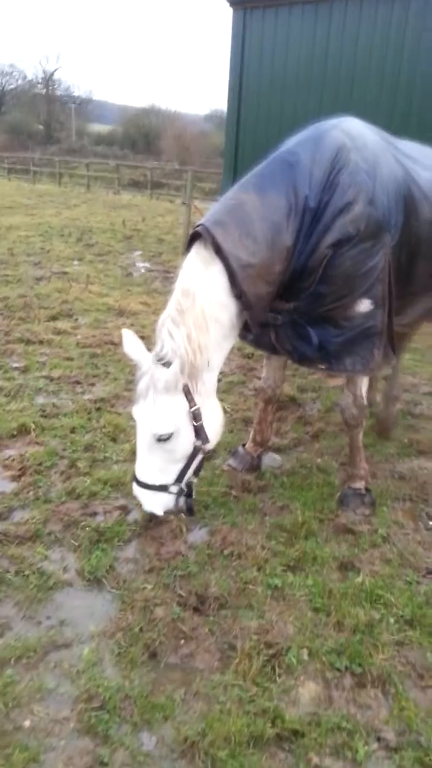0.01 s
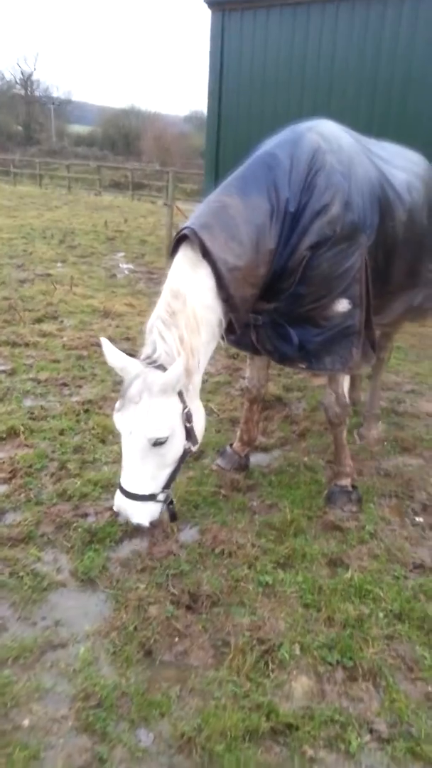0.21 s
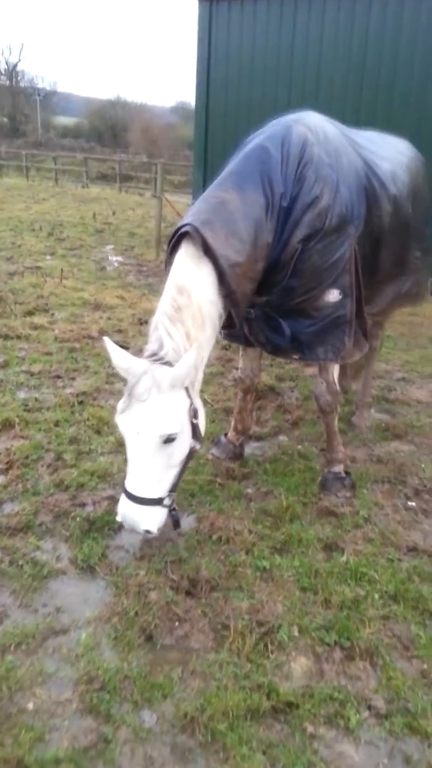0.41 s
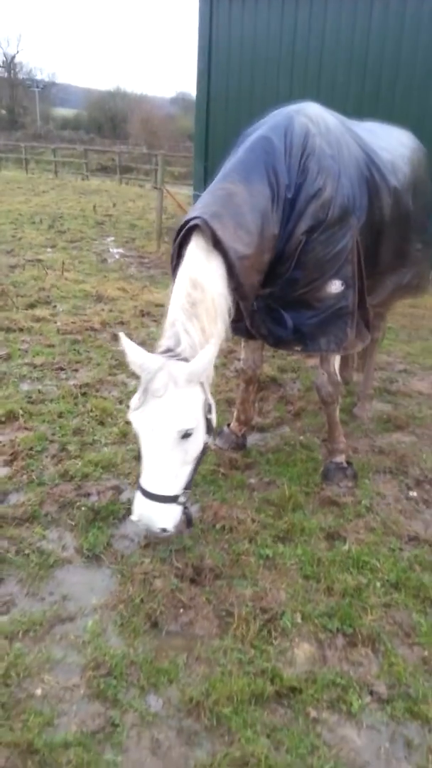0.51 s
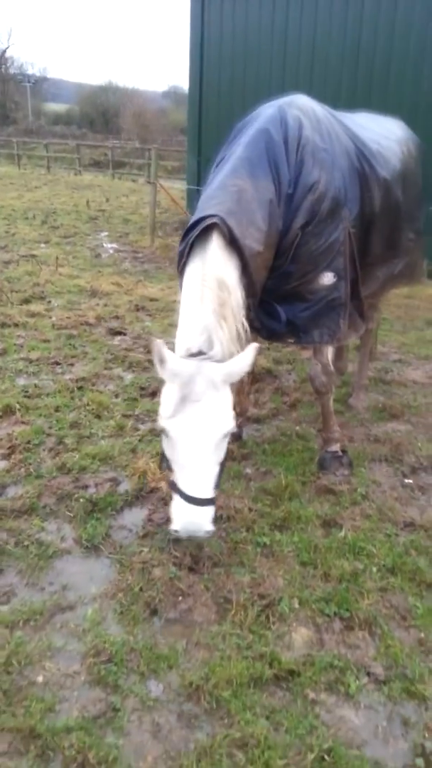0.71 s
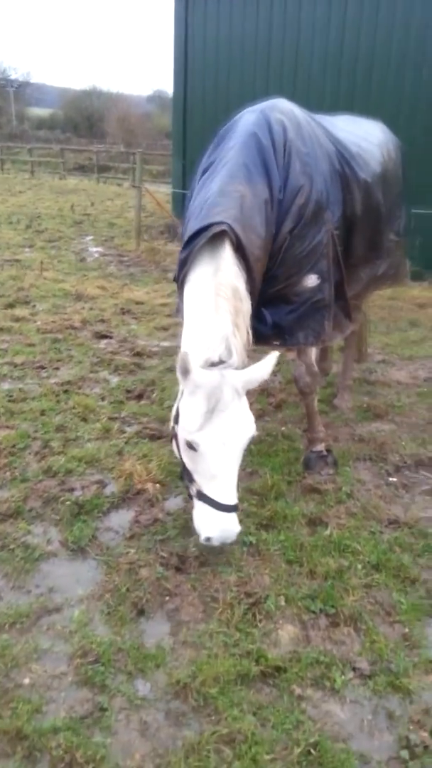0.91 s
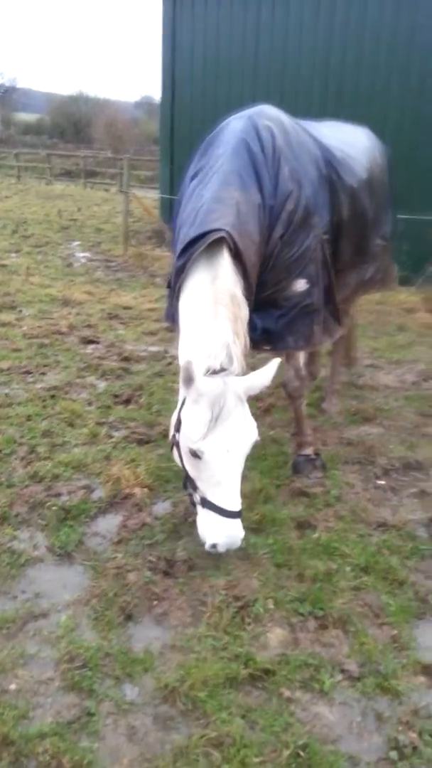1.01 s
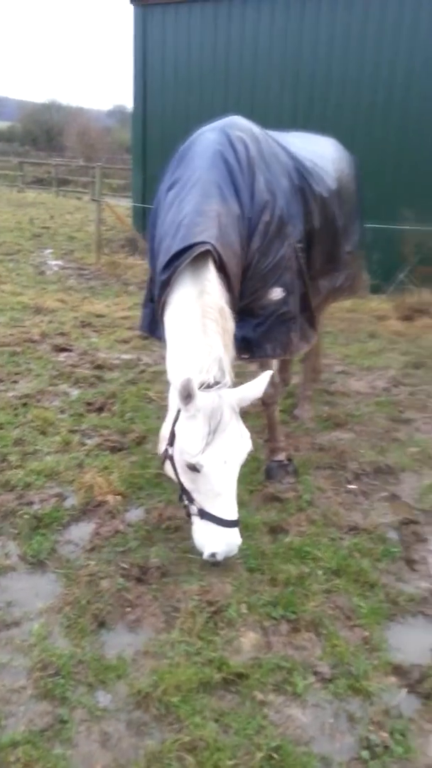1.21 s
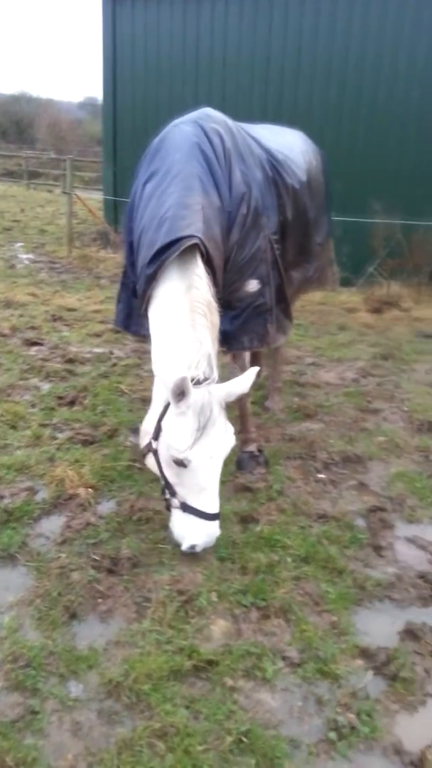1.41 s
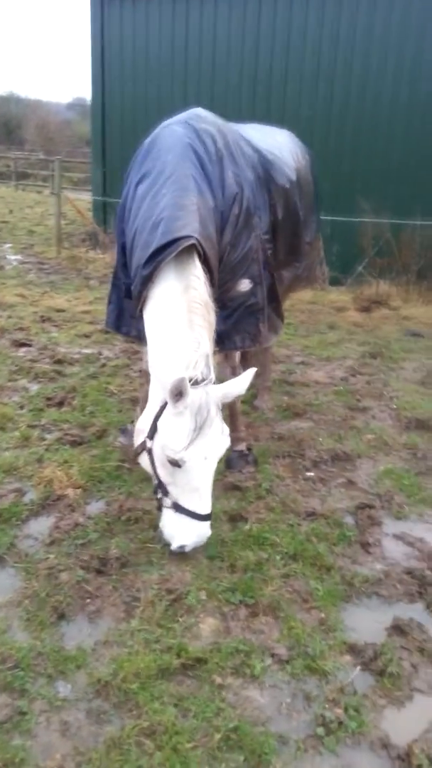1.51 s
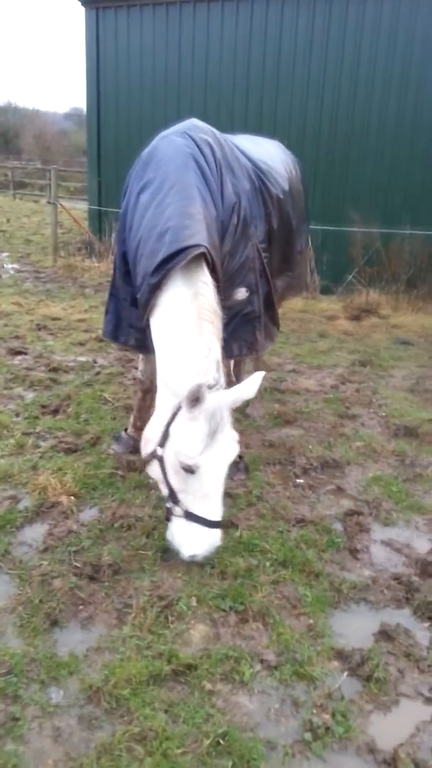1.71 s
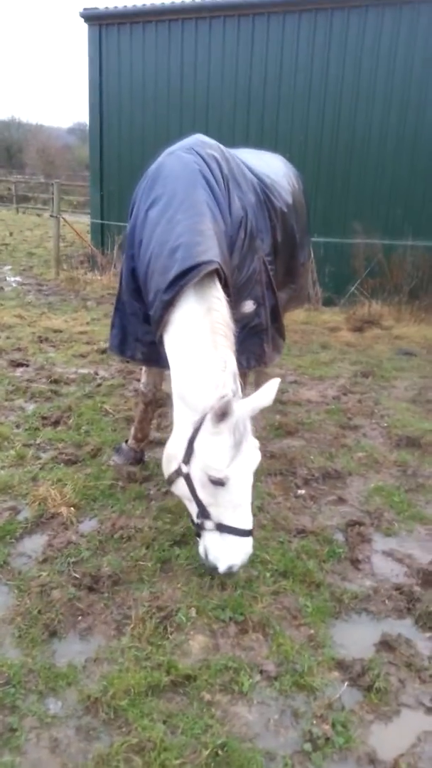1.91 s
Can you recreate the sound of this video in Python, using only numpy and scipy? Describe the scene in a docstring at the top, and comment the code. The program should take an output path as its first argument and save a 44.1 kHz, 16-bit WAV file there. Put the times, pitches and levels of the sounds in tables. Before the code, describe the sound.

A horse snort: a short grainy rasp at 0.1 seconds, then from 0.23 a strong, wet nostril flutter with rushing air and tiny squeaks, weakening and slowing until about 0.87, ending in a small puff of air. Grass rustles with clicks around 1.05-1.12 and 1.55-1.78; a soft sniff comes near 1.5. Low wind buffets the right side, strongest at 1.7, over quiet outdoor hush.

```python
"""A grazing horse gives one long snort: both nostrils flutter, each at its own uneven, slowing rate.
Each flap is a soft puff ringing the nose plus a wet slap of noise, over a hiss of rushing air.
A wet rasp of grainy noise comes first; a noise sniff, clicks in rustling grass and ringing squeaks add detail.
Wind, made of brief pressure dips and low noise, buffets the right side of the microphone.
A soft outdoor hush of coloured noise lies behind, and the muddy paddock adds faint echoes."""
import sys
import numpy as np
from scipy import signal
from scipy.fft import rfft, irfft
from scipy.io import wavfile

SR = 44100
rng = np.random.default_rng(int(sys.argv[2]) if len(sys.argv) > 2 else 0)


def wav_out(sig):
    """Save sig, one row per channel (or a flat mono array), as 16-bit PCM at SR to the path in sys.argv[1]."""
    wavfile.write(sys.argv[1], SR, np.round(np.clip(np.atleast_2d(sig).T, -1, 1) * 32767).astype(np.int16))


N = 88200
T = np.arange(N) / SR  # time in seconds

# All levels are set before panning, echoes and the microphone's colour.
# Snort: first flap of each nostril, and the time after which no flap starts, in seconds
FIRST_A_S, FIRST_B_S, SNORT_END_S = .2383, .2301, .86
# Flutter rate of each nostril. Each row: time in seconds, flaps per second.
FLUTTER_RATE_A = [(.24, 32.3), (.27, 32.2), (.3, 30.5), (.333, 32.3), (.365, 30.2), (.41, 28.9),
                  (.53, 30.1), (.64, 30.3), (.8, 26.9)]
FLUTTER_RATE_B = [(.23, 30.3), (.263, 29), (.297, 29.5), (.331, 26.4), (.37, 26.6), (.46, 25.45),
                  (.62, 26.7), (.8, 23.45)]
# Strength of the flaps of each nostril. Each row: time in seconds, strength in dB before the puff trim.
FLAP_FORCE_A = [(.238, -9), (.27, -6.5), (.333, -10.5), (.365, -11.5), (.44, -17.5), (.55, -16),
                (.67, -22.5), (.77, -13.5), (.805, -17), (.843, -19)]
FLAP_FORCE_B = [(.23, -21.5), (0.265, -8.5), (.33, -6.5), (0.369, -12), (.41, -16), (.485, -21.5),
                (.525, -19), (.64, -19), (.72, -23.5), (.8, -22.5), (.84, -32)]
# Half width of the dip in a flap of FIRM_DB; harder flaps are shorter, by a share per dB
FLAP_HALF_S, FIRM_DB, QUICKER_PER_DB = .00054, -14, .011
# Random spread from flap to flap: strength in dB, then width and nose pitch as shares
FLAP_SPREAD_DB, WIDTH_SPREAD, NOSE_SHIFT = 1.14, .07, .07
# Bass cut of the puffs in Hz, and their trim in dB
RADIATION_HZ, PUFF_DB = 125, -3.5
# Ringing of the nose after a flap. Each row: pitch in Hz, width in Hz, level in dB.
NOSE_MODES = [(249, 86, 5), (670, 267, 5), (864, 120, -9)]
# Narrow passages, rung by slap and hiss. Each row: pitch in Hz, width in Hz, level in dB.
PASSAGE_MODES = [(850, 108, 10.5), (1348, 165, 4), (1840, 220, -21), (2247, 160, 1.5), (2990, 100, -9.5),
                 (3830, 210, -21)]
PASSAGE_TOP_HZ, PASSAGE_SHIFT = 4440, .058  # treble cut; random pitch shift as a share
# Loudness of the wet slap against its flap. Each row: time in seconds, relative level in dB.
SLAP_WETNESS = [(.33, -14), (.47, -9), (.59, -5), (.66, -10), (.75, -6), (.84, -7.5)]
SLAP_RISE_S, SLAP_DECAY_S, SLAP_SPREAD_DB = .001, .003, 2
# Rush of air through the nostrils. Each row: time in seconds, level in dB.
AIR_FLOW = [(.17, -85), (.2, -54), (.235, -41.5), (.27, -38), (.32, -35), (.36, -41), (.42, -41),
            (.47, -48.5), (.8, -63), (.865, -59), (.895, -41.5), (.93, -54), (1.0, -80)]
SPRAY_PER_S, SPRAY_DB, JET_DB = 550, 17, -4.5  # droplets per second; dB against the steady air, the hiss
# Colour of the jet noise outside. Each row: frequency in Hz, relative dB per Hz.
JET_COLOUR = [(600, -30), (1500, 10.5), (4500, 5), (6000, 1), (10000, -2.5), (14000, -22)]

# Loudness of the rasp. Each row: time in seconds, level in dB.
RASP_LEVEL = [(.095, -60), (.105, -39), (.128, -43.5), (.137, -30.5), (.145, -34), (.156, -42.5),
              (.167, -36), (.185, -43.5), (.22, -52), (.25, -77)]
# Hollow ringing of the rasp. Each row: pitch in Hz, width in Hz, relative level in dB.
RASP_RINGING = [(865, 87, -2), (1150, 71, 1), (1410, 140, 13), (2000, 270, -4), (2400, 340, 0.5),
                (3100, 300, -5)]
RASP_FIZZ_DB, RASP_GRAIN_DB = -7.5, -3  # jet noise against ringing; grains against a steady level
# Wet pops and squeaks at the muzzle. Each row: time in seconds, peak in dB, pitch in Hz,
# half length in seconds.
MUZZLE_SQUEAKS = [(0.135, -27.5, 850, 0.0034), (0.165, -28.5, 1480, 0.0047), (0.23, -35.5, 5060, .003),
                  (0.2622, -19.5, 3110, 0.0012), (0.268, -13.5, 2400, 0.002), (0.292, -28.5, 4770, 0.006),
                  (0.299, -15.5, 2430, 0.0027), (.312, -25, 2350, 0.0065), (0.3218, -20, 2420, 0.0024),
                  (0.3357, -31.5, 9300, 0.0013), (0.395, -30, 2050, 0.0012), (.8912, -28, 2800, 0.0032),
                  (1.704, -41, 3530, 0.0012), (1.740, -41, 2400, 0.0059)]
SQUEAK_WIDTH = .32  # resonance width as a share of the pitch
# Loudness of the soft sniff. Each row: time in seconds, level in dB.
SNIFF_LEVEL = [(1.33, -74), (1.44, -52), (1.58, -54.5), (1.68, -74)]
# Ringing of the sniff. Each row: pitch in Hz, width in Hz, relative level in dB.
SNIFF_RINGING = [(1950, 750, 0), (2800, 650, 0)]
# Clicks of lips, grass and teeth. Each row: time in seconds, peak in dB, pitch in Hz.
GRAZING_CLICKS = [(1.0375, -34, 4500), (1.0625, -31, 3200), (1.0835, -33, 900), (1.1212, -20, 1700),
                  (1.549, -32, 2400), (1.573, -28, 2600), (1.6175, -21.5, 3400), (1.630, -28, 3800),
                  (1.7785, -26, 1000)]
CLICK_WIDTH = .8  # resonance width as a share of the pitch
# Loudness of the rustling grass. Each row: time in seconds, level in dB.
RUSTLE_LEVEL = [(0, -50), (.85, -44.5), (.95, -45.5), (1.02, -51), (1.12, -45.5), (1.2, -54.5), (1.35, -53),
                (1.46, -47), (1.58, -50), (1.68, -49), (1.74, -48.5), (1.81, -54), (2, -56)]
# Colour of the rustle. Each row: frequency in Hz, relative dB per Hz.
GRASS_COLOUR = [(650, 17.5), (1400, 8.5), (2100, 6), (2900, 5), (4500, -3.5), (7000, -10), (14000, -27)]

# Single buffets on the microphone. Each row: time in seconds, peak in dB on the right.
WIND_BUFFETS = [(0.2048, -17), (0.7133, -19), (0.852, -20), (0.8686, -23), (0.8763, -15.5), (1.118, -22.5),
                (1.328, -24.5), (1.5052, -20), (1.5118, -24), (1.5223, -23.5), (1.6427, -22.5),
                (1.6623, -21.5), (1.7057, -12), (1.713, -10), (1.7496, -10), (1.7561, -21), (1.7711, -19)]
BUFFET_HALF_S, WIND_LEFT_DB = .00095, -29.5  # half width of the dip; left side against right
# Rumble of the eddies between buffets. Each row: time in seconds, level in dB on the right.
EDDY_LEVEL = [(0, -34), (.05, -54), (.16, -56.5), (.25, -31.5), (.45, -42), (.8, -40.5), (.87, -30.5),
              (.93, -43.5), (1.03, -48), (1.07, -36.5), (1.125, -39.5), (1.17, -50.5), (1.29, -43.5),
              (1.32, -36), (1.36, -48), (1.48, -51), (1.51, -34), (1.55, -32), (1.62, -41), (1.69, -42),
              (1.77, -29.5), (1.81, -49), (1.94, -91), (1.99, -50)]
# Colour of the eddies. Each row: frequency in Hz, relative dB per Hz.
EDDY_COLOUR = [(25, -17.5), (60, -1.5), (140, 3), (280, -1), (420, -18.5), (700, -20.5), (1500, -50)]
# Colour of the outdoor hush. Each row: frequency in Hz, relative dB per Hz.
HUSH_COLOUR = [(25, -19), (90, -1.5), (250, 4), (420, -2.5), (600, -0.5), (1000, -2.5), (2000, -8),
               (4000, -13.5), (6500, -18), (9000, -15.5), (14500, -17.5)]
HUSH_DB = -48

# Likeness of left and right in coloured noise. Each row: frequency in Hz, likeness from 0 to 1.
SIDE_LIKENESS = [(50, 1), (500, 0.79), (1500, 0.089), (4000, 0), (10000, 0)]
# Lean to the right: each pan lowers the left and raises the right by this many dB
FLUTTER_PAN_DB, HISS_PAN_DB, SQUEAK_PAN_DB, HUSH_PAN_DB = 1.5, 1.5, 1.5, 1.5
LEFT_LEAD_S = .00008  # the flutter reaches the left this much sooner
# Echoes from ground and shed. Each row: delay in seconds, left level in dB, right level in dB.
EARLY_ECHOES = [(.0017, -22, -10), (.0143, -24, -22)]
SCATTER_DB, SCATTER_T60_S, SCATTER_HZ = -12, .09, 3960  # level, time to fade by 60 dB, treble cut
# Extra upper middle on the right of the microphone. Each row: pitch in Hz, width in Hz, added level in dB.
RIGHT_BRIGHTNESS = [(4440, 1100, -14.5)]
CUTOFF_HZ = 14700


def from_db(db):
    """Turn decibels into gain."""
    return 10 ** (np.asarray(db) / 20)


def rms_one(x):
    """Scale to an average power of one."""
    return x / np.sqrt(np.mean(x ** 2) + 1e-20)


def curve(rows, s=T):
    """Read a table at the given times, with straight lines between its rows."""
    return np.interp(s, *np.transpose(rows))


def at_hz(points, hz):
    """Read a table of frequencies, with straight lines over log frequency."""
    return curve([(np.log(f), v) for f, v in points], np.log(hz))


def pan(db):
    """Left and right gains that lean a sound to the right."""
    return from_db([[-db], [db]])


def resonate(x, modes):
    """Resonances ring side by side, each peaking at gain 1 before its own dB; wider ones die sooner."""
    out = 0
    for hz, width, db in modes:
        r = np.exp(-np.pi * width / SR)
        feedback = [1, -2 * r * np.cos(2 * np.pi * hz / SR), r * r]
        ringing = signal.lfilter([1, 0, -1], feedback, x + 1e-18)
        out = out + from_db(db) * (1 - r * r) / 2 * ringing
    return out


def white():
    """White noise, partly shared by the two sides."""
    return rms_one(rng.standard_normal(N) + 1.33 * rng.standard_normal((2, N)))


def noise(spectrum):
    """Stereo noise of a given colour, alike on both sides in the bass, with power one."""
    hz = np.maximum(np.fft.rfftfreq(N, 1 / SR), 1)
    mid, side = rfft(rng.standard_normal((2, N)))
    alike = np.clip(at_hz(SIDE_LIKENESS, hz), 0, 1)
    sides = np.sqrt(1 + alike) * mid + np.sqrt(1 - alike) * side * [[1], [-1]]
    below = np.minimum(hz / spectrum[0][0], 1) ** 2  # fades under the lowest row
    return rms_one(irfft(below * from_db(at_hz(spectrum, hz)) * sides, N))


def dying(clicks, decay_s):
    """Each click starts an exponential fall."""
    return signal.lfilter([1], [1, -np.exp(-1 / (decay_s * SR))], clicks + 1e-18)


def crackle(per_s, spread_db, decay_s):
    """Loudness shape of random little bursts of uneven size, with power one."""
    sizes = from_db(spread_db * np.minimum(rng.exponential(1, N), 3))
    starts = rng.random(N) < per_s / SR
    return rms_one(dying(sizes * starts, decay_s))


def puff(s, half_s):
    """A brief, smooth check in an air stream: a pressure dip between two crests."""
    u = np.minimum(((T - s) / half_s) ** 2, 100)
    return (u - 1) * np.exp(-u / 2)


def nostril(first_s, rate, force):
    """The wall flaps shut again and again; each flap puffs into the nose, slaps wetly and reshapes it."""
    puffs, slaps = np.zeros(N), np.zeros((2, N))
    air, s = white(), first_s
    slap_t = T[:SR // 40]
    slap_shape = np.minimum(slap_t / SLAP_RISE_S, 1) * np.exp(-slap_t / SLAP_DECAY_S)
    for size, width, wet, stretch in rng.standard_normal((30, 4)):
        if s > SNORT_END_S:
            break
        db = curve(force, s) + FLAP_SPREAD_DB * size
        half_s = FLAP_HALF_S * np.exp(WIDTH_SPREAD * width - QUICKER_PER_DB * (db - FIRM_DB))
        flap = from_db(db) * puff(s, half_s)
        nose = [(hz * np.exp(NOSE_SHIFT * stretch), wide, gain) for hz, wide, gain in NOSE_MODES]
        puffs += flap + resonate(flap, nose)

        # the slap starts two typical half widths before the middle of the dip, near the leading crest, and
        # swells in
        span = int((s - 2 * FLAP_HALF_S) * SR) + np.arange(len(slap_t))
        slap = passages(air[:, span] * slap_shape, PASSAGE_SHIFT * stretch)
        slap_db = curve(SLAP_WETNESS, s) + db + SLAP_SPREAD_DB * wet
        slaps[:, span] += 2 * from_db(slap_db) * slap
        s += 1 / curve(rate, s)
    bass_cut = signal.butter(1, RADIATION_HZ, "high", fs=SR, output="sos")
    return from_db(PUFF_DB) * signal.sosfilt(bass_cut, puffs) + slaps


def passages(x, stretch=0):
    """Narrow nasal passages ring and damp the treble; stretch shifts their pitches."""
    modes = [(hz * np.exp(stretch), width, db) for hz, width, db in PASSAGE_MODES]
    treble_cut = signal.butter(2, PASSAGE_TOP_HZ, fs=SR, output="sos")
    return signal.sosfilt(treble_cut, resonate(x, modes))


def hiss():
    """Air and droplets rush through the passages, with a broad jet noise outside."""
    spray = from_db(SPRAY_DB) * crackle(SPRAY_PER_S, spread_db=4, decay_s=.001)
    air = rms_one(passages(white() * (1 + spray)))
    return from_db(curve(AIR_FLOW)) * (air + from_db(JET_DB) * noise(JET_COLOUR))


def rasp():
    """Grainy bursts of noise ring hollow resonances, with a fizz of jet noise."""
    bursts = crackle(per_s=900, spread_db=3, decay_s=.001)
    grains = rms_one(1 + from_db(RASP_GRAIN_DB) * bursts)
    hollow = rms_one(resonate(white(), RASP_RINGING))
    fizz = from_db(RASP_FIZZ_DB) * noise(JET_COLOUR)
    return from_db(curve(RASP_LEVEL)) * grains * (hollow + fizz)


def ping(envelope, hz, width, db):
    """A burst of noise rings one steep-sided resonance, up to a given peak."""
    mode = [(hz, width * hz, 0)]
    x = resonate(resonate(envelope * white(), mode), mode)
    return from_db(db) * x / abs(x).max()


def squeaks():
    """Films of moisture at nostrils and lips pop and squeak for a few milliseconds."""
    total = 0
    for s, db, hz, half_s in MUZZLE_SQUEAKS:
        swell = np.exp(-np.minimum(((T - s) / half_s) ** 2, 20))
        total = total + ping(swell, hz, SQUEAK_WIDTH, db)
    return total


def sniff():
    """The horse draws air softly back in: noise through two broad nostril resonances."""
    return from_db(curve(SNIFF_LEVEL)) * rms_one(resonate(white(), SNIFF_RINGING))


def snap(s, db, hz):
    """One sharp break rings a heavily damped resonance, up to a given peak."""
    impulse = 1. * (np.arange(N) == int(s * SR))
    x = resonate(impulse, [(hz, CLICK_WIDTH * hz, 0)])
    return from_db(db) * x / abs(x).max()


def grass():
    """Dry clicks of lips, grass and teeth over a fine crackling rustle."""
    crackling = noise(GRASS_COLOUR) * crackle(per_s=1000, spread_db=4.5, decay_s=.0027)
    clicks = sum(snap(s, db, hz) for s, db, hz in GRAZING_CLICKS)
    return from_db(curve(RUSTLE_LEVEL)) * crackling + clicks


def paddock(x):
    """Ground and shed return two early echoes, and the surroundings a faint, dull scatter."""
    out = x.copy()
    for delay_s, left_db, right_db in EARLY_ECHOES:
        late = [np.interp(T - delay_s, T, side, left=0) for side in x]
        out += from_db([[left_db], [right_db]]) * late
    treble_cut = signal.butter(2, SCATTER_HZ, fs=SR, output="sos")
    tail = signal.sosfilt(treble_cut, white()) * from_db(-60 * T / SCATTER_T60_S)
    # set the tail's energy by the share of the spectrum that it fills
    tail *= np.sqrt(2 * SCATTER_HZ / SR / np.sum(tail[0] ** 2))
    return out + from_db(SCATTER_DB) * signal.fftconvolve(x, tail, axes=1)[:, :N]


def wind():
    """Eddies and single buffets strike the right port and barely reach the left."""
    buffets = sum(from_db(db) * puff(s, BUFFET_HALF_S) for s, db in WIND_BUFFETS)
    eddies = from_db(curve(EDDY_LEVEL)) * noise(EDDY_COLOUR)
    return (buffets + eddies) * from_db([[WIND_LEFT_DB], [0]])


def hush():
    """The outdoor background is steady noise, strongest in the bass."""
    return from_db(HUSH_DB) * noise(HUSH_COLOUR) * pan(HUSH_PAN_DB)


def scene():
    """The horse a little to the right, wind on the microphone, the hush behind."""
    nostril_a = nostril(FIRST_A_S, FLUTTER_RATE_A, FLAP_FORCE_A)
    nostril_b = nostril(FIRST_B_S, FLUTTER_RATE_B, FLAP_FORCE_B)
    left, right = (nostril_a + nostril_b) * pan(FLUTTER_PAN_DB)
    flutter = np.array([np.interp(T + LEFT_LEAD_S, T, left), right])
    breath_and_grass = (hiss() + rasp() + sniff() + grass()) * pan(HISS_PAN_DB)
    horse = flutter + breath_and_grass + squeaks() * pan(SQUEAK_PAN_DB)
    return paddock(horse) + wind() + hush()


def record(dry):
    """The microphone's right side is a little brighter; the top is cut steeply."""
    left, right = dry
    coloured = np.array([left, right + resonate(right, RIGHT_BRIGHTNESS)])
    top_cut = signal.ellip(12, .1, 90, CUTOFF_HZ, fs=SR, output="sos")
    return signal.sosfilt(top_cut, coloured)


dry = scene()
out = record(dry)
wav_out(out)
```